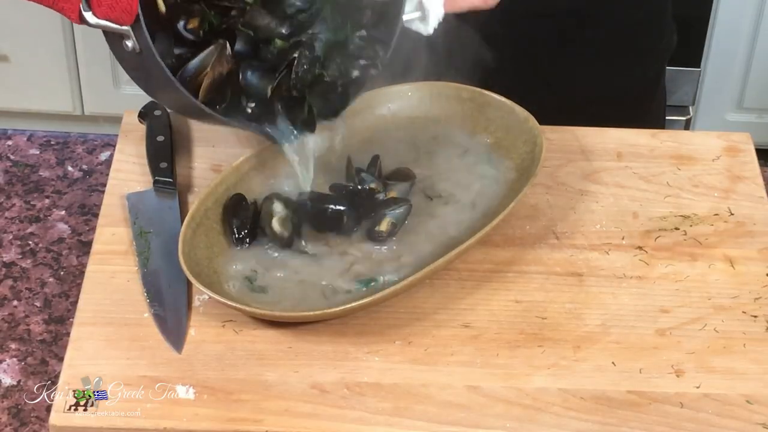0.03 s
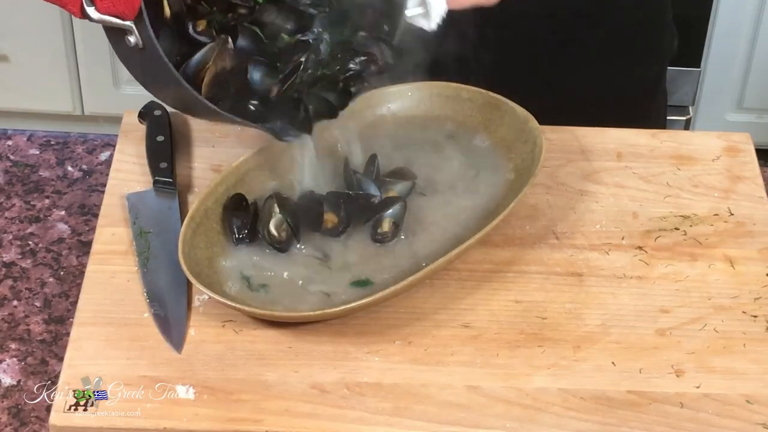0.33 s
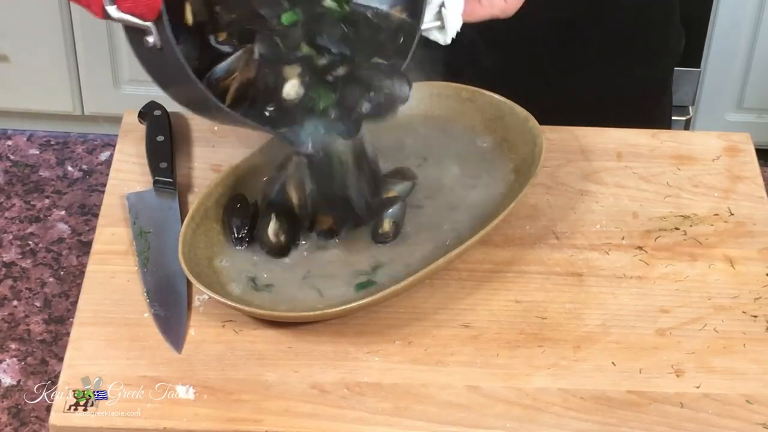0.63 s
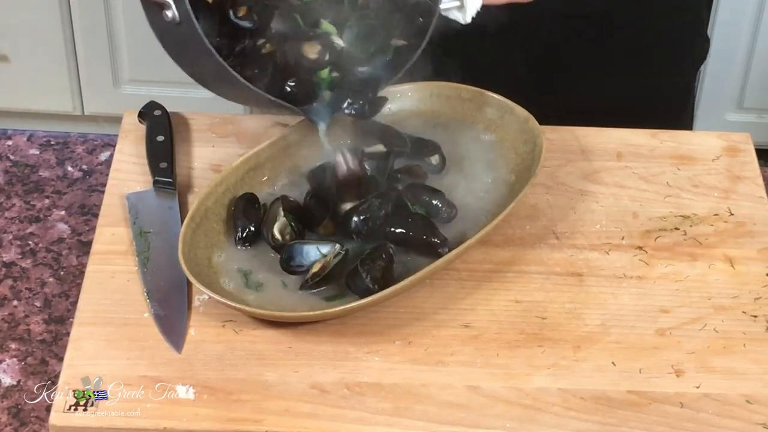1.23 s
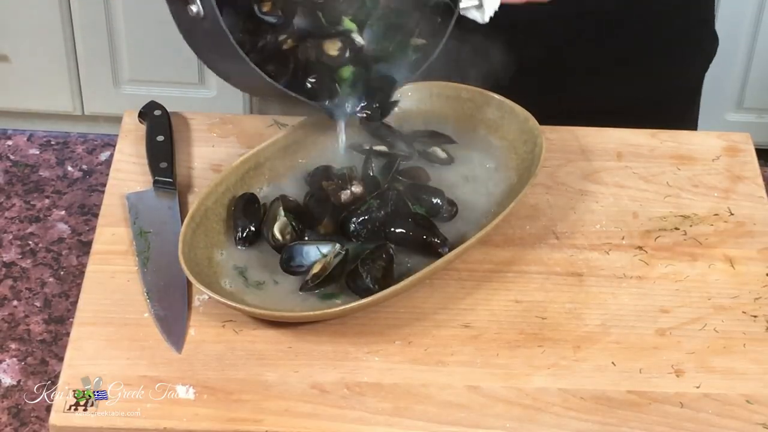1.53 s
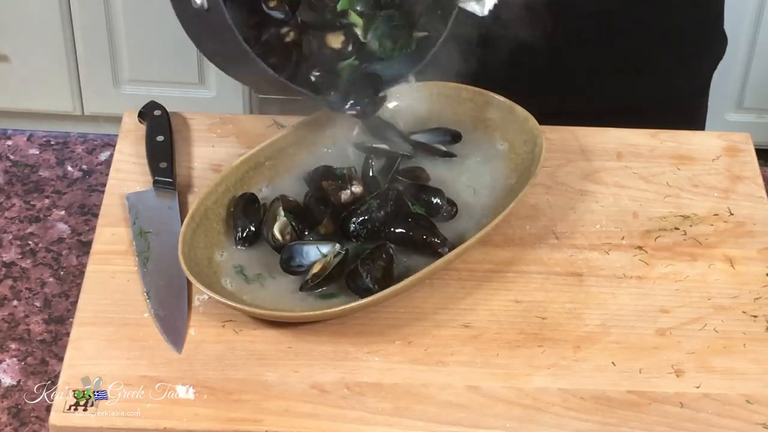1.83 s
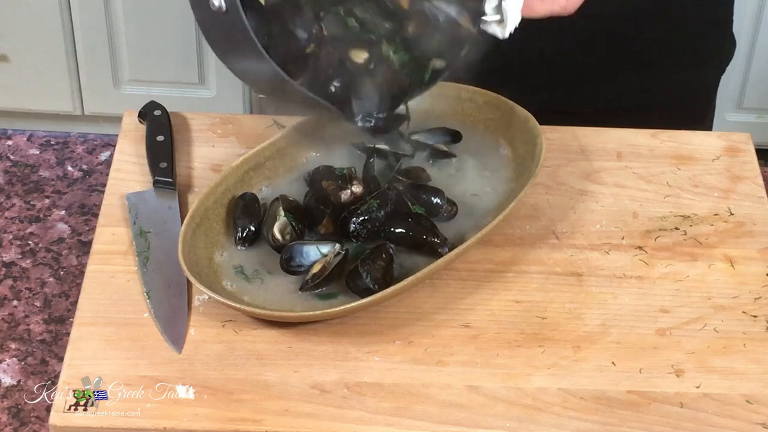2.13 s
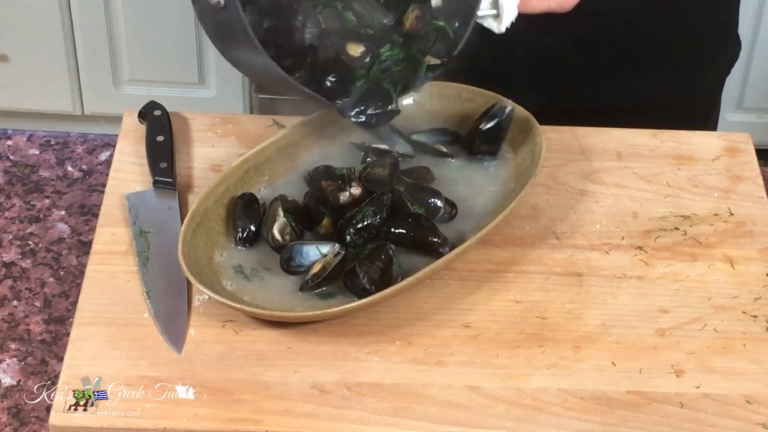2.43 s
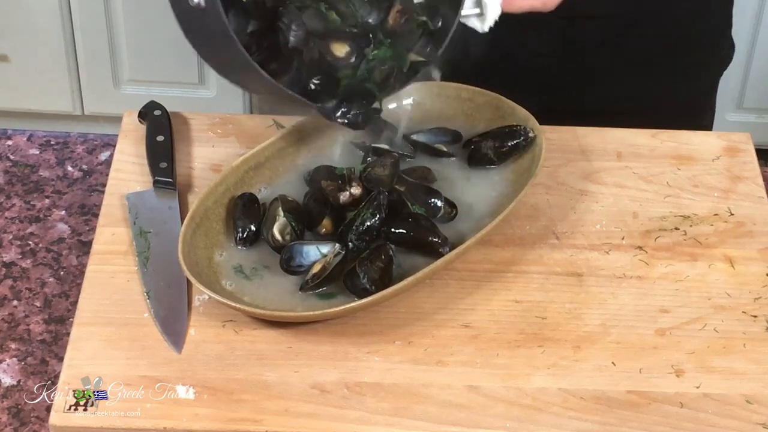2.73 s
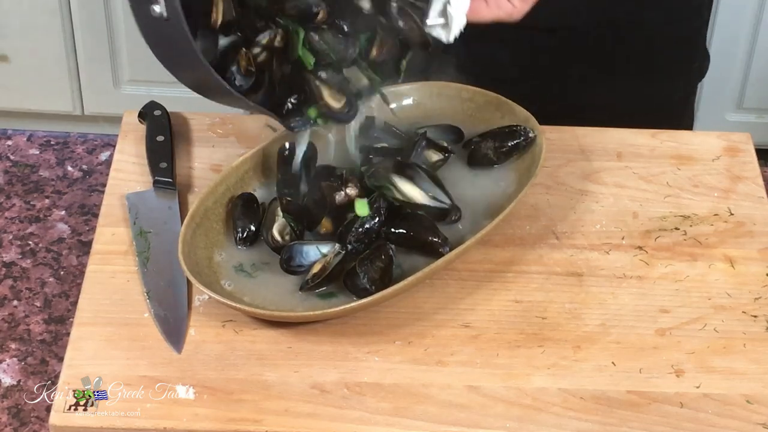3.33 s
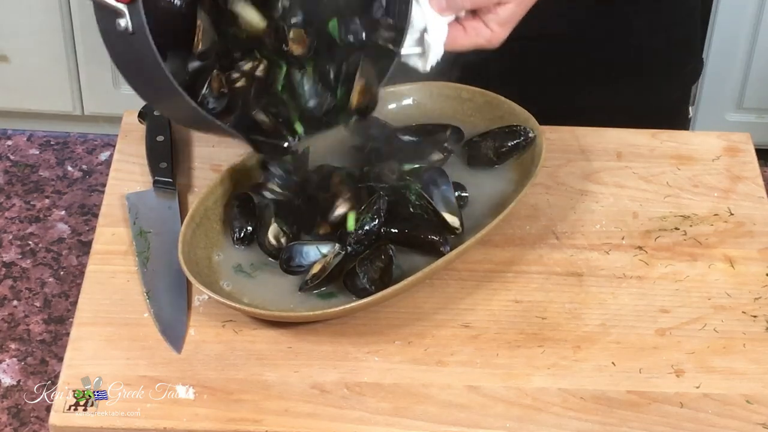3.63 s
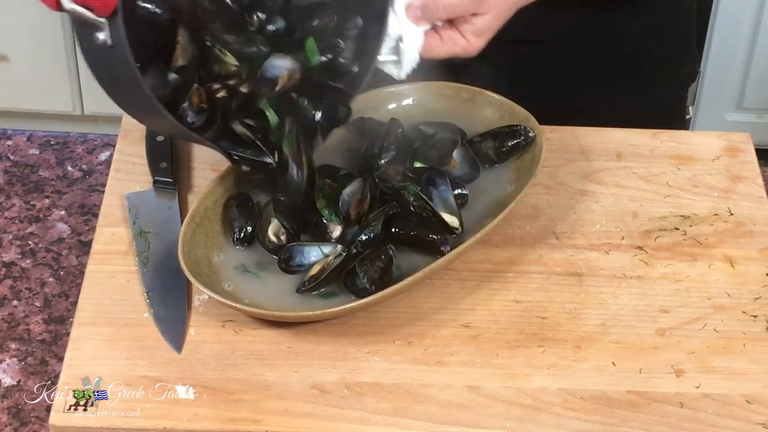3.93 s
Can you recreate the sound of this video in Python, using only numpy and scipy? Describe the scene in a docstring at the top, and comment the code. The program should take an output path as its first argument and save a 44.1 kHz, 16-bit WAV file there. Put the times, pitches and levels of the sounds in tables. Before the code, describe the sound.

Cooked mussels slide from a metal pot into a ceramic dish, shells clacking over a wet crackle and softly bubbling broth. The pot bumps dully, the dish rings briefly, then more shells scrape out, heard close in a small kitchen.

```python
"""First comes a wet crackle of small shells and bubbling broth: cooked mussels are being tipped from a metal
pot into a ceramic dish on a wooden board. Shells clack on one another, the pot bumps down with dull thuds that
set the board booming, and the dish rings when struck. Clumps land softly, and in the second half something
scrapes unevenly along the pot wall. One microphone, close by, in a small kitchen with a faint appliance hum."""
import sys
import numpy as np
from scipy import signal
from scipy.fft import rfft, irfft, next_fast_len
from scipy.io import wavfile
from scipy.ndimage import uniform_filter1d

SR = 44100
rng = np.random.default_rng(int(sys.argv[2]) if len(sys.argv) > 2 else 0)


def unload_wav(signal):
    """Save mono or channel-first audio to the path in sys.argv[1] as 16-bit WAV at rate SR, clipped to [-1, 1]."""
    wavfile.write(
        sys.argv[1],
        SR,
        np.round(np.clip(np.atleast_2d(signal).T, -1, 1) * 32767).astype(np.int16),
    )


N = 176400

# The kitchen's reverberation. Each row: frequency in Hz, t60 in seconds.
KITCHEN_DECAY = [(100, 0.77), (400, 0.49), (1200, 0.39), (3000, 0.3), (8000, 0.29), (15000, 0.17)]
# Spectra of the room tone, the wet fizz, a shell's snap and the hard edge of a pot bump.
# Each row: frequency in Hz, relative level in dB.
ROOM_TONE_COLOUR = [(22, -60), (44, -3.5), (263, -5.5), (293, 8), (326, -4.5), (1890, -61), (3620, -27.5),
                    (16000, -51)]
FIZZ_COLOUR = [(200, -32), (700, 1.5), (1200, 10), (1800, 7), (2800, 6.5), (4800, -1.5), (7000, -14),
               (11000, -20), (16000, -30)]
SNAP_COLOUR = [(100, -15.5), (400, 6), (800, 7), (1700, 1.5), (2800, 1), (4700, 8.5), (7000, -2),
               (11000, -10), (16000, -25)]
POT_EDGE_COLOUR = [(200, -3.5), (1200, -13), (2000, 8), (2900, 8.5), (4200, -2), (5000, -0.5), (7000, -18),
                   (15000, -25.5)]
# The course of the crackle, the broth and the scraping. Each row: time in seconds, level in dB.
CRACKLE_LEVEL = [(0, -42), (.14, -64), (.2, -56), (.4, -53.5), (.6, -57.5), (.68, -43.5), (.8, -41),
                 (1.14, -46.5), (1.26, -49.5), (1.35, -67.5), (1.58, -68), (1.8, -55), (1.92, -54),
                 (2.02, -46), (2.1, -55.5), (2.68, -64), (2.83, -42), (3.1, -49), (3.19, -59), (3.34, -44),
                 (3.43, -59.5), (3.62, -42.5), (3.73, -57.5), (3.84, -38.5), (3.93, -69), (4, -33.5)]
BROTH_LEVEL = [(0, -41.5), (.06, -61), (.15, -61), (.22, -45.5), (.6, -53), (.78, -43.5), (1.25, -54),
               (1.4, -57.5), (1.6, -60.5), (1.68, -47), (2.0, -48), (2.6, -58), (2.9, -44), (3.2, -51),
               (3.33, -43.5), (3.7, -49), (4, -50)]
SCRAPE_LEVEL = [(1.62, -57), (1.74, -51), (1.81, -36.5), (1.87, -72), (1.95, -35), (2.03, -31), (2.07, -57),
                (2.15, -41.5), (2.25, -67), (2.74, -46), (2.82, -35), (2.91, -30.5), (2.98, -43),
                (3.08, -27), (3.2, -58), (3.26, -43), (3.37, -46.5), (3.45, -46.5), (3.52, -37)]
# Shell on shell. Each row: start in seconds, level in dB, pitch in Hz, t60 in seconds, relative snap in dB.
SHELL_CLACKS = [(.001, -46.5, 2910, 0.12, 13.5), (.231, -31.5, 2370, 0.0088, -3.5),
                (0.2906, -16.5, 2580, 0.0067, -8.5), (0.401, -35.5, 2150, 0.013, 3),
                (0.52, -27.5, 2710, 0.014, -1.5), (0.637, -20.5, 3060, 0.013, 3),
                (0.6751, -16.5, 2750, 0.011, -6), (0.7245, -12.5, 2596, 0.015, -13),
                (0.764, -26, 3220, 0.022, -15), (0.771, -24.5, 3020, 0.021, 4),
                (0.845, -17.5, 3100, 0.0046, -4), (0.866, -30, 4120, .012, 5),
                (0.8759, -13, 3750, 0.0073, -35), (0.8919, -25, 4310, 0.035, 12.5),
                (.9403, -26, 2980, 0.01, -15), (0.965, -19.5, 2900, 0.029, -22),
                (0.9909, -13, 3100, 0.01, 0), (1.065, -25.5, 2660, 0.047, 14),
                (1.082, -19.5, 3060, 0.0094, -0.5), (1.097, -25, 2660, 0.034, 2),
                (1.1125, -15.5, 2790, 0.022, -6.5), (1.13, -32, 2900, 0.018, 3),
                (1.2009, -21, 2520, 0.0053, -4.5), (1.462, -48, 2250, 0.022, -3),
                (1.6639, -33, 2450, 0.0077, -12), (1.7922, -30, 3065, 0.023, 8.5),
                (1.8798, -40, 2520, 0.026, -4), (1.95, -31, 3390, 0.016, 5),
                (1.9941, -24.5, 2257, 0.035, 2.5), (2.007, -18.5, 2820, 0.014, -26),
                (2.036, -27, 2160, 0.012, -8), (2.2377, -24, 2730, 0.032, -1),
                (2.4, -22.5, 2840, 0.013, -2), (2.433, -18.5, 2320, 0.0055, -16),
                (2.903, -30.5, 2730, 0.038, -11), (2.929, -33, 3060, 0.013, 4),
                (2.9472, -22.5, 2300, 0.014, 8.5), (2.9866, -24, 2840, 0.011, 1.5),
                (3.0038, -22.5, 2780, 0.02, -24), (3.0565, -23, 3170, 0.013, -28),
                (3.0952, -27, 2610, 0.023, 1.5), (3.1114, -28, 2760, 0.024, 4),
                (3.218, -35, 2950, 0.036, -15), (3.2847, -28, 3260, 0.031, 11),
                (3.3057, -15.5, 2660, 0.012, -11), (3.46, -31, 2480, 0.011, -2),
                (3.521, -24, 2770, 0.024, 7), (3.5779, -19, 2590, 0.02, 8), (3.605, -26.5, 2885, 0.031, -1),
                (3.6316, -23.5, 2750, 0.016, -12), (3.671, -28, 2770, 0.021, -15),
                (3.709, -24.5, 4370, 0.013, -33), (3.7639, -19.5, 2616, 0.037, -5.5),
                (3.8061, -31.5, 3540, 0.051, 5), (3.8292, -19.5, 3160, 0.0089, -2.5),
                (3.837, -27, 2850, .035, 2), (3.9667, -29.5, 2740, 0.033, 0.5),
                (3.9884, -16, 2900, 0.018, 2.5)]
# Modes of a typical shell. Each row: ratio to the clack's pitch, relative level in dB.
SHELL_MODES = [(0.423, -9), (0.822, -9.5), (0.998, 2.5), (1.111, -3), (1.551, -14.5), (2.3, -26)]
# Single hard slips on the pot wall, and clumps landing on dish and board.
# Each row: start in seconds, level in dB, pitch in Hz, t60 in seconds.
WALL_SLIPS = [(.029, -24, 840, 0.02), (2.860, -17, 557, 0.025), (2.885, -21, 525, 0.056),
              (2.914, -14, 968, 0.02), (3.0935, -11, 610, 0.018), (3.0945, -11, 943, 0.016),
              (3.452, -28.5, 487, 0.13), (3.906, -29, 526, 0.04)]
CLUMP_LANDINGS = [(.772, -27, 1076, 0.076), (.990, -32, 203, 0.048), (1.056, -27.5, 641, 0.055),
                  (1.144, -33.5, 948, 0.059), (1.203, -37, 304, 0.064), (3.5778, -18.5, 222, 0.007),
                  (3.579, -34, 65, 0.021)]
# The pot bumping down. Each row: start in seconds, knock, boom and hard edge in dB, rise in seconds.
POT_BUMPS = [(0.4241, -13, -37, -25, 0.0012), (0.621, -13.5, -37, -23.5, 0.0026),
             (2.179, -13, -30, -13, 0.0015), (2.2144, -14.5, -39.5, -28.5, 0.0025),
             (2.3659, -23, -63, -27, 0.00068)]
# Modes of the pot against dish and board, and of the board on the worktop.
# Each row: nominal frequency in Hz, relative level in dB.
KNOCK_MODES = [(200, -11.5), (325, 1), (470, 1), (600, 3), (760, 3), (930, 1.5), (1050, 3), (1190, 6.5),
               (1320, -2.5), (1450, 1)]
BOARD_MODES = [(48, -0.5), (72, -4), (134, 4.5), (163, 5), (207, 0.5), (270, -3.5), (321, 11.5), (350, 9)]
# Blows on the dish. Each row: start in seconds, level in dB, most excited pitch in Hz,
# width of that band in octaves, factor on the ring time.
DISH_BLOWS = [(0.425, -28.5, 9800, 0.35, 1.2), (0.7247, -29, 1240, 1.1, 0.27),
              (0.9654, -22.5, 1300, 5.5, 0.19), (0.989, -10.5, 1620, 0.14, 0.52),
              (1.0645, -32, 1470, 2.7, 0.3), (1.2012, -27, 1750, 0.72, 0.25),
              (2.181, -19.5, 1100, 0.76, 0.63), (2.3658, -18, 1110, 7.4, 0.41),
              (2.7178, -19, 3130, 1, 0.37), (3.283, -29, 1960, 1.2, 0.2), (3.505, -18.5, 3340, 0.64, 0.37),
              (3.578, -36, 1110, 0.45, 0.64), (3.757, -26, 3400, 0.27, 0.55),
              (3.772, -27.5, 890, 1.6, 0.11)]
# Modes of the dish. Each row: frequency in Hz, relative level in dB, base t60 in seconds.
DISH_MODES = [(367, -13.5, 0.42), (727, 4.5, 0.16), (1040, 0.5, 0.12), (1228, -3.5, 0.44), (1295, -4, 0.29),
              (1423, -23, 0.16), (1650, -8.5, 0.12), (1945, -7.5, 0.27), (2760, -2.5, 0.043),
              (3424, -1.5, 0.15), (4410, -14.5, 0.078), (4350, -11, 0.1), (5040, -14, 0.19),
              (6190, -22.5, 0.15), (7220, -20, 0.11), (14900, -18, 0.076)]
# Flicks of thin shell edges. Each row: start in seconds, level in dB, pitch in Hz.
EDGE_FLICKS = [(0.768, -28, 10500), (0.876, -24.5, 7650), (0.965, -22.5, 11500), (1.208, -38, 7000),
               (2.079, -49, 7900), (2.258, -37, 7600), (2.885, -43, 11700), (2.928, -38, 6800),
               (3.108, -33.5, 12900), (3.153, -48, 8240), (3.32, -34, 7500)]
# Resonances of the scraped pot. Each row: frequency in Hz, width in Hz, relative level in dB.
POT_RESONANCES = [(470.4, 57, -4), (564, 135, -6.5), (666, 195, -9.5), (963, 410, -10), (983, 68, -5)]

SHELL_RISE_S, SNAP_T60, SHELL_WET_DB = 0.00025, 0.011, -7
EVENT_T = np.arange(SR // 2) / SR  # seconds since a contact


def amp(db):
    return 10 ** (np.asarray(db) / 20)


def unit_rms(x):
    return x / np.sqrt(np.mean(x ** 2) + 1e-20)


def along(points, hz):
    """Interpolate (Hz, value) points on a log frequency axis."""
    freqs, values = np.transpose(points)
    return np.interp(np.log(hz + 1), np.log(freqs + 1), values)


def envelope(rows):
    """Gain per sample from (seconds, dB) points, silent outside them."""
    times, db = np.transpose(rows)
    return amp(np.interp(np.arange(N) / SR, times, db, left=-120, right=-120))


def fade(t60):
    """Exponential decay, 60 dB down after t60 seconds."""
    return np.exp(-np.log(1000) * EVENT_T / t60)


def rise(rise_s):
    """Soft onset of a blow."""
    return 1 - np.exp(-EVENT_T / rise_s)


def ping(hz, t60):
    """One damped mode."""
    return np.sin(2 * np.pi * hz * EVENT_T) * fade(t60)


def polarity(count=None):
    return rng.choice([-1, 1], count)


def add(out, start, x):
    """Mix x into out from start, in seconds."""
    i = round(start * SR)
    out[i:i + len(x)] += x[:N - i]


def coloured(x, colour):
    """Minimum-phase filter of unit energy, shaped by (Hz, dB) points."""
    size = 4096
    cepstrum = irfft(np.log(amp(along(colour, np.fft.rfftfreq(size, 1 / SR)))))
    cepstrum[1:size // 2] *= 2
    cepstrum[size // 2 + 1:] = 0
    response = irfft(np.exp(rfft(cepstrum)))
    return signal.fftconvolve(x, response / np.linalg.norm(response))[:len(x)]


def burst(colour, t60):
    """A dying puff of coloured noise with the energy of a unit damped sine."""
    puff = coloured(rng.standard_normal(SR // 2) * fade(t60), colour)
    return puff * np.linalg.norm(fade(t60)) / np.linalg.norm(puff) / np.sqrt(2)


def grains(per_s, spread_db):
    """Random impulses of uneven size."""
    size = amp(spread_db * np.minimum(rng.exponential(size=N), 4))
    return (rng.random(N) < per_s / SR) * size * polarity(N)


def scatter(count):
    """Random small events. Each row: start in seconds, then size and pitch in standard deviations."""
    return np.column_stack([rng.random(count) * N / SR, rng.standard_normal((count, 2))])


def clicks(centre_hz, spread, t60, spread_db, count):
    """Randomly timed tiny contacts, each a puff of noise around its own pitch."""
    out = np.zeros(N)
    shape = (fade(t60) * rise(SHELL_RISE_S))[:SR // 20]
    for start, size, pitch in scatter(count):
        step = 2 * np.pi * centre_hz * np.exp(spread * np.tanh(pitch)) / SR
        jitter = uniform_filter1d(rng.standard_normal(len(shape)), size=5)
        phase = np.cumsum(step + np.sqrt(0.3 * step) * jitter)  # bandwidth about 0.3 of the pitch
        add(out, start, amp(spread_db * min(size, 2)) * shape * np.sin(phase))
    return unit_rms(out)


def kitchen(x, wet_db):
    """At the microphone: direct sound, early bounces off pot and worktop, and a short room tail."""
    hz, t, spectra = signal.stft(rng.standard_normal(SR // 2), SR, nperseg=256)
    decay = np.exp(-np.log(1000) * t / along(KITCHEN_DECAY, hz)[:, None])
    tail = signal.istft(spectra * decay, SR)[1][:SR // 2]
    early_boost = 1 + amp(8.5) * fade(t60=0.034)
    tail = tail * early_boost * (EVENT_T > 0.003)  # first bounce after 3 ms
    return x + amp(wet_db) * signal.fftconvolve(x, tail / np.linalg.norm(tail))[:len(x)]


def blunt_contacts(rows, rise_s, wet_db):
    """Contacts that each excite one low, well damped resonance."""
    out = np.zeros(N)
    for start, db, hz, t60 in rows:
        add(out, start, kitchen(2 * amp(db) * ping(hz, t60) * rise(rise_s), wet_db))
    return out


def room_tone(hum_hz=312):
    """Quiet kitchen air with a faint appliance hum."""
    air = unit_rms(coloured(rng.standard_normal(N), ROOM_TONE_COLOUR))
    hum = np.sqrt(2) * np.sin(2 * np.pi * hum_hz * np.arange(N) / SR)
    return amp(-57.5) * air + amp(-64.5) * hum


def wet_crackle():
    """Countless wet contacts in the sliding heap: a dull fizz, jostling shells and bright ticks."""
    fizz = unit_rms(coloured(grains(per_s=1100, spread_db=4), FIZZ_COLOUR))
    jostle = clicks(centre_hz=2907, spread=0.42, t60=0.019, spread_db=13.5, count=1000)
    ticks = clicks(centre_hz=6870, spread=0.464, t60=0.01, spread_db=4, count=600)
    heap = unit_rms(fizz + amp(-4.5) * jostle + amp(-23.5) * ticks)
    return kitchen(heap * envelope(CRACKLE_LEVEL), wet_db=-2)


def broth(centre_hz=868, centre_t60=0.035, spread_db=1):
    """Short bubbles of rising pitch where the broth runs into the dish."""
    out, t = np.zeros(N), EVENT_T[:SR // 20]
    for start, size, pitch in scatter(count=700):
        hz = centre_hz * np.exp(0.4264 * pitch)
        age = t * hz / centre_hz / centre_t60  # higher bubbles die sooner
        bubble = np.sin(2 * np.pi * hz * t * (1 + 0.07 * age)) * np.exp(-np.log(1000) * age)
        add(out, start, amp(spread_db * size) * bubble)
    return kitchen(unit_rms(out) * envelope(BROTH_LEVEL), wet_db=-5)


def shell_clacks():
    """Each clack is a snap and a few quickly damped modes of one shell, softened by the wet contact."""
    out = np.zeros(N)
    for start, db, hz, t60, snap_db in SHELL_CLACKS:
        ring = sum(amp(mode_db) * polarity() * ping(hz * ratio ** rng.uniform(0.84, 1.25), t60)
                   for ratio, mode_db in SHELL_MODES)
        snap = amp(snap_db) * burst(SNAP_COLOUR, SNAP_T60)
        clack = amp(db) * (ring + snap) * rise(SHELL_RISE_S)
        add(out, start, kitchen(clack, SHELL_WET_DB))
    return out


def wall_slips():
    """A shell slips hard on the pot wall and sounds one brief, low note."""
    return blunt_contacts(WALL_SLIPS, rise_s=0.003, wet_db=-11)


def pot_bumps():
    """The heavy pot knocks: a dull, quickly damped blow, a hard edge and a lingering boom of the board."""
    out = np.zeros(N)
    for start, knock_db, boom_db, edge_db, rise_s in POT_BUMPS:
        knock = sum((-1) ** k * amp(db) * ping(hz * rng.uniform(0.891, 1.038), t60=0.031)
                    for k, (hz, db) in enumerate(KNOCK_MODES))
        boom = sum(polarity() * amp(db) * ping(hz * rng.uniform(0.98, 1.03), t60=0.34)
                   for hz, db in BOARD_MODES)
        blow = amp(knock_db) * knock + amp(edge_db) * burst(POT_EDGE_COLOUR, t60=0.056)
        add(out, start, kitchen(blow, wet_db=-3.5) * rise(rise_s))
        add(out, start, amp(boom_db) * boom * rise(0.0015))
    return out


def dish_rings():
    """Each blow rings the ceramic in the band that its contact favours, over a dense, short crack."""
    out = np.zeros(N)
    upper_modes = [(hz, -28.5, 0.14) for hz in rng.uniform(5130, 16070, size=36)]
    for start, db, centre_hz, octaves, ring_factor in DISH_BLOWS:
        def favoured(hz):
            return np.exp(-0.5 * (np.log2(hz / centre_hz) / octaves) ** 2)

        ring = sum(amp(mode_db) * favoured(hz) * polarity() * ping(hz, t60 * ring_factor)
                   for hz, mode_db, t60 in list(DISH_MODES) + upper_modes)
        crack_spectrum = rfft(burst(SNAP_COLOUR, t60=0.04), SR)
        crack = irfft(crack_spectrum * favoured(np.fft.rfftfreq(SR, 1 / SR) + 1))[:len(ring)]
        blow = amp(db) * (ring + amp(-14) * crack) * rise(SHELL_RISE_S)
        add(out, start, kitchen(blow, wet_db=-3))
    return out


def edge_flicks():
    """Thin shell edges flick past each other: a very short snap in one band of the treble."""
    out = np.zeros(N)
    for start, db, hz in EDGE_FLICKS:
        colour = [(hz / 2, -19), (hz, 0), (hz * 2, -38)]
        add(out, start, kitchen(amp(db) * burst(colour, SNAP_T60), SHELL_WET_DB))
    return out


def clump_landings():
    """Clumps of mussels land softly on the dish and board."""
    return blunt_contacts(CLUMP_LANDINGS, rise_s=0.00005, wet_db=-16.5)


def pot_scrape(cutoff_hz=1500):
    """An uneven scrape along the wall drives the resonances of the pot."""
    f = np.fft.rfftfreq(N, 1 / SR)
    body = sum((-1) ** k * amp(db) * 1j * f * width / (hz * hz - f * f + 1j * f * width)
               for k, (hz, width, db) in enumerate(POT_RESONANCES))
    slips = grains(per_s=340, spread_db=4)
    rub = unit_rms(irfft(rfft(slips) * body / (1 + (f / cutoff_hz) ** 4), N))
    return kitchen(rub * envelope(SCRAPE_LEVEL), wet_db=-28)


def scene():
    """All contacts and the broth over the room tone, at one microphone."""
    contacts = clump_landings() + wall_slips() + pot_bumps() + dish_rings() + shell_clacks()
    return (contacts + edge_flicks() + pot_scrape() + wet_crackle() + broth() + room_tone())[None]


def record(dry):
    """The microphone channel passes nothing above 16.1 kHz."""
    size = next_fast_len(N + SR // 2)
    passband = np.fft.rfftfreq(size, 1 / SR) < 16100
    return irfft(rfft(dry, size) * passband, size)[:, :N]


dry = scene()
out = record(dry)
unload_wav(out)
```